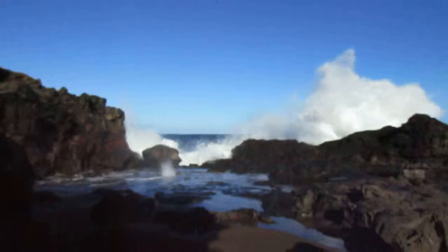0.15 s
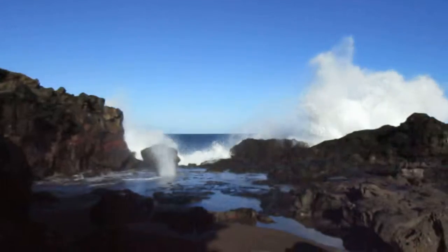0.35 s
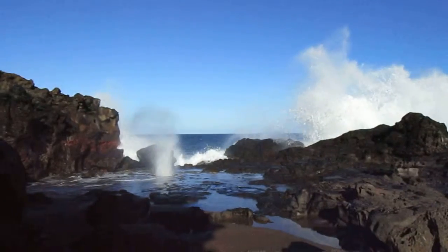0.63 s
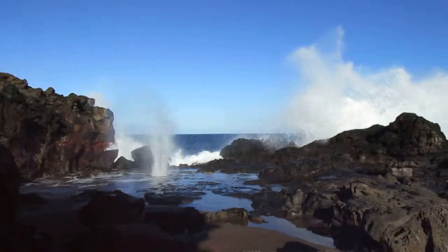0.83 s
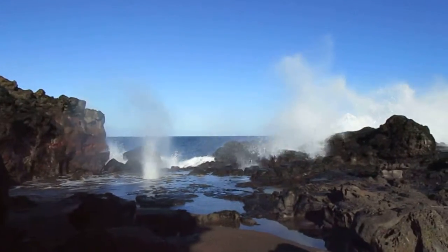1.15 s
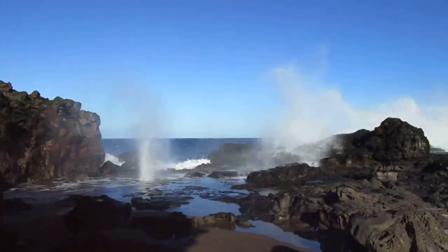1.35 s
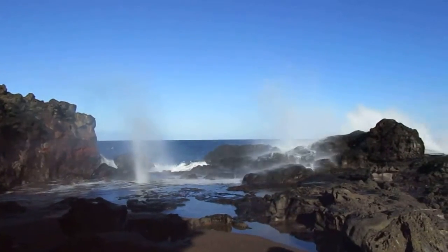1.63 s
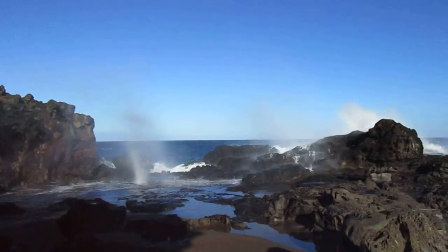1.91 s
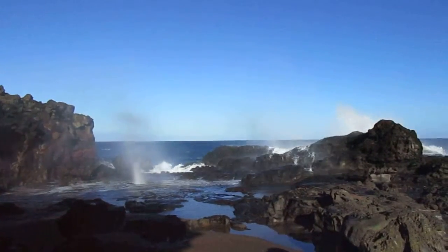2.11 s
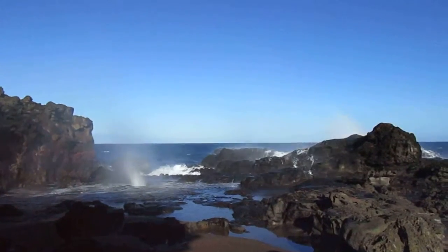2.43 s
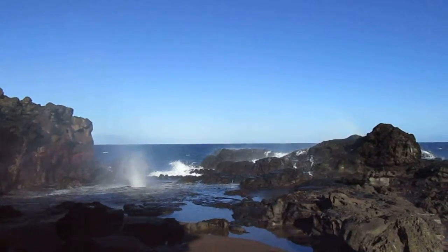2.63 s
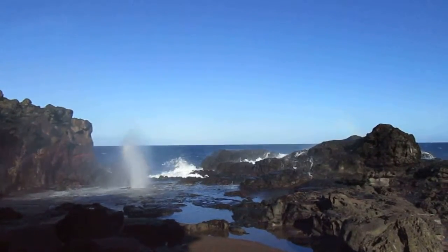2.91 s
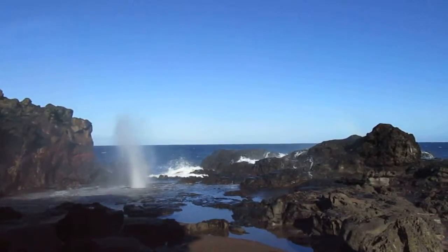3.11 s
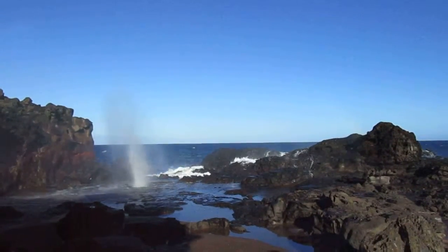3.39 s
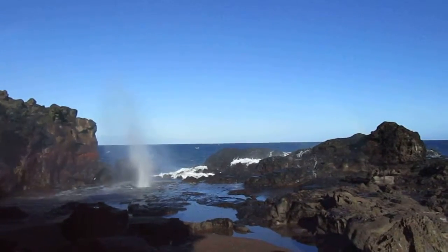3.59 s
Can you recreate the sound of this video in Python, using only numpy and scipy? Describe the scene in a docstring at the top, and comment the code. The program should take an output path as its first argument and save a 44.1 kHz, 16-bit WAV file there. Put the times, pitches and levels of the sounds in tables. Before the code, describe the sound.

Surf bursts over shore rocks and the falling spray hisses, then drops away to quiet water and a faint blowhole jet. Stiff gusts thump on the microphone all along, later adding short rasps, snaps and hollow knocks.

```python
"""A rocky shore in a stiff wind. The sound cuts in on a breaker bursting on the rocks, its spray raining
down as a broad hiss, while eddies buffet the microphone with low thumps that go on throughout. From about
one second the fastest eddies tear at its port with rasps and snaps. Near two seconds the hiss dies away
to the wash of the sea and the faint jet of a blowhole, and the port gives a few hollow knocks."""
import sys
import numpy as np
from scipy import signal
from scipy.fft import rfft, irfft
from scipy.io import wavfile
from scipy.ndimage import uniform_filter1d, minimum_filter1d

SR = 44100
rng = np.random.default_rng(int(sys.argv[2]) if len(sys.argv) > 2 else 0)


def output_pcm(signal):
    """Save a mono or channel-first signal as 16-bit PCM at the path in sys.argv[1].

    Samples are clipped to [-1, 1] before scaling.
    """
    pcm = np.clip(np.atleast_2d(signal).T, -1, 1) * 32767
    wavfile.write(sys.argv[1], SR, np.round(pcm).astype(np.int16))


N = 165375
T = np.arange(N) / SR
FREQS = np.fft.rfftfreq(N, 1 / SR)


def undb(db):
    """Decibels to gain."""
    return 10 ** (np.asarray(db) / 20)


def unit(x):
    """Scale to rms 1."""
    return x / np.sqrt(np.mean(x ** 2))


def fader(table, column=1):
    """Gain over time from one dB column of a table."""
    rows = np.array(table)
    return undb(np.interp(T, rows[:, 0], rows[:, column]))


def colour(x, eq):
    """Shape a signal with an EQ curve, at rms 1."""
    hz, db = np.array(eq).T
    gain = undb(np.interp(np.log(FREQS + 1), np.log(hz), db))
    return unit(irfft(rfft(x) * gain, N))


def noise():
    """White noise."""
    return rng.standard_normal(N)


def wander(rate_hz):
    """Smooth random modulation at rms 1, rolling off above rate_hz."""
    return unit(irfft(rfft(noise()) * np.exp(-(FREQS / rate_hz) ** 2), N))


def turbulence(eq, rough_db, rate_hz):
    """Pressure that comes in clumps, as small eddies ride on large ones."""
    clumps = noise() * undb(rough_db * np.clip(wander(rate_hz), -2, 2))
    return colour(clumps, eq)


def ride_level(x, span_s):
    """Hold the slow level of a signal at 1 and keep its quick flutter."""
    size = int(span_s * SR)
    power = uniform_filter1d(uniform_filter1d(x ** 2, size), size)
    return x / np.sqrt(power + 1e-9)


def burst(x, start, length, db, edge_s):
    """Gate out a soft-edged stretch of a signal and set its rms level."""
    gated = x * (1 + np.tanh((T - start) / edge_s)) * (1 + np.tanh((start + length - T) / edge_s))
    return gated * undb(db) * np.sqrt(length * SR / np.sum(gated ** 2))


# The bright tone of spray. Each row: frequency in Hz, relative level in dB.
SPRAY_EQ = [(500, -15), (2000, 2.5), (3800, -1), (6000, 2), (8500, 2), (10000, -0.5), (12000, -5),
            (14000, -11.5), (15700, -19)]
# Fader for the falling spray and the blowhole jet. Each row: time in seconds, level in dB.
SPRAY_FADER = [(.19, -38), (.65, -41), (.9, -34), (.935, -39), (.985, -36.5), (1.04, -41.5), (1.41, -31),
               (1.68, -30.5), (1.86, -34.5), (2.078, -41), (2.09, -48.5), (2.23, -52), (2.33, -51),
               (2.355, -58.5), (2.7, -54.5), (3.05, -56.5), (3.25, -59), (3.74, -61)]
DROPS_PER_S, DROP_MIX = 890, 0.26


def spray():
    """Fine mist hisses and countless drops patter on rock; the faint tail is the blowhole jet."""
    drops = (rng.random(N) < DROPS_PER_S / SR) * noise()
    hiss = colour(noise() + DROP_MIX * unit(drops), SPRAY_EQ)
    return hiss * fader(SPRAY_FADER) * undb(0.74 * wander(rate_hz=22))


# The midrange body of white water. Each row: frequency in Hz, relative level in dB.
WASH_EQ = [(100, -41), (400, 8.5), (1000, 2), (1600, 5), (2400, 2), (3200, -1), (4200, -4), (6000, -59),
           (14000, -42)]
# Fader for the churning water. Each row: time in seconds, level in dB before the trim.
WASH_FADER = [(.19, -35), (.72, -36.5), (.85, -33.5), (.895, -30.5), (.94, -36), (1.04, -37.5), (1.19, -35),
              (1.68, -33), (1.86, -36), (2.04, -41.5), (2.11, -49.5), (2.31, -55.5), (2.36, -57.5),
              (2.7, -51.5), (2.95, -54), (3.74, -55.5)]
WASH_TRIM_DB, CROSSOVER_HZ = -1, 1600


def wash():
    """White water churns among the rocks; its lows and highs seethe separately."""
    water = colour(noise(), WASH_EQ)
    lows = irfft(rfft(water) / (1 + (FREQS / CROSSOVER_HZ) ** 4), N)
    highs = water - lows
    seething = lows * undb(.9 * wander(rate_hz=20)) + highs * undb(.7 * wander(rate_hz=25))
    return seething * fader(WASH_FADER) * undb(WASH_TRIM_DB)


# The wind's deep rumble and the rounder thump above it. Each row: frequency in Hz, relative level in dB.
RUMBLE_EQ = [(12, 2), (25, -5.5), (60, 1), (110, -2.5), (160, -7.5), (300, -65.5), (1200, -110)]
THUMP_EQ = [(60, -12), (110, 0), (150, 1), (215, -1), (330, -6), (450, -14.5), (560, -20), (700, -30.5),
            (1000, -47), (4000, -110)]
# The wind bed between buffets. Each row: time in seconds, rumble and thump in dB before the trim.
BREEZE_FADERS = [(.19, -28, -21), (.5, -7.5, -26), (.75, -24.5, -22), (1.0, -19, -21.5), (1.35, -22, -21.5),
                 (2.1, -16.5, -26), (2.28, -17, -17.5), (2.37, -33, -42), (2.46, -19, -17.5),
                 (2.56, -25.5, -25), (2.75, -38, -15.5), (2.88, -38, -26), (3.0, -17, -20.5),
                 (3.09, -30.5, -37.5), (3.3, -22.5, -25), (3.55, -23, -33.5), (3.74, -34.5, -42.5)]
BREEZE_TRIM_DB = -4


def breeze():
    """Restless low flutter of wind on the microphone."""
    rumble = ride_level(turbulence(RUMBLE_EQ, rough_db=7.5, rate_hz=29.6), span_s=0.11)
    thump = ride_level(turbulence(THUMP_EQ, rough_db=4, rate_hz=24), span_s=0.31)
    bed = rumble * fader(BREEZE_FADERS, column=1) + thump * fader(BREEZE_FADERS, column=2)
    return bed * undb(BREEZE_TRIM_DB)


# The higher thump of a fast eddy. Each row: frequency in Hz, relative level in dB.
FAST_THUMP_EQ = [(70, -11.5), (150, 5), (300, 2.5), (520, -3.5), (720, -17), (1000, -22.5), (4000, -110)]
# Eddies hitting the microphone. Each row: start and length in seconds, rumble and thump in dB before trims.
BUFFET_CUES = [(0.176, 0.031, -9.5, -16.5), (0.263, 0.012, -6.5, -11.5), (0.36, 0.063, -5, -17),
               (0.473, 0.063, -8.5, -24), (0.501, 0.057, -2, -27), (0.601, 0.044, -5, -13.5),
               (0.889, 0.037, -5.5, -7.5), (0.959, 0.031, 2, -24), (0.99, 0.022, -2, -2),
               (1.03, 0.0086, -21, -2), (1.067, 0.0097, -32, -7), (1.141, 0.048, -31, -12.5),
               (1.451, 0.068, -11.5, -12), (1.537, 0.068, -10.5, -15), (1.699, 0.028, -7.5, -24),
               (1.808, 0.044, -8, -12), (1.864, 0.041, 0, -11), (1.972, 0.071, -5, -12),
               (2.056, 0.012, 4, -4), (2.111, 0.02, -21, -3.5), (2.146, 0.016, 0.5, -8.5),
               (2.192, 0.018, -1.5, -3.5), (2.252, 0.044, -12, -9.5), (2.314, 0.038, -13, -11),
               (2.391, 0.042, -31, -8.5), (2.609, 0.0085, -20, -20.5), (2.673, 0.012, 0, -4),
               (2.716, 0.046, -15, -8.5), (2.776, 0.015, -9, -6), (2.831, 0.026, -13.5, -10.5),
               (2.988, 0.0085, -8, -4), (3.189, 0.0099, -10.5, -18), (3.259, 0.018, -10.5, -16.5),
               (3.394, 0.05, -24, -13.5), (3.483, 0.0085, -2.5, -14), (3.559, 0.039, -13, -26)]
RUMBLE_TRIM_DB, THUMP_TRIM_DB, BUFFET_EDGE_S = -10, -7, 0.0048
FAST_SPAN_DB = 4  # excess of thump over rumble that turns an eddy fast


def buffets():
    """Each large eddy pushes on the microphone with a rumble and a thump; faster ones thump higher."""
    rumble = turbulence(RUMBLE_EQ, rough_db=-1, rate_hz=160)
    slow = turbulence(THUMP_EQ, rough_db=5.5, rate_hz=204)
    fast = turbulence(FAST_THUMP_EQ, rough_db=5.5, rate_hz=204)
    out = np.zeros(N)
    for start, length, rumble_db, thump_db in BUFFET_CUES:
        fast_mix = (1 + np.tanh((thump_db - rumble_db) / FAST_SPAN_DB)) / 2
        thump = np.sqrt(1 - fast_mix) * slow + np.sqrt(fast_mix) * fast
        out += burst(rumble, start, length, rumble_db + RUMBLE_TRIM_DB, BUFFET_EDGE_S)
        out += burst(thump, start, length, thump_db + THUMP_TRIM_DB, BUFFET_EDGE_S)
    return out


# Sharp pressure hits from small eddies, plus one thin overload click as the slap at 2.33 s clips the
# recorder. Each row: time in seconds, peak in dB, half-width in seconds.
SLAP_AND_CLICK_CUES = [(0.27, -3, 0.0012), (0.609, -9, 0.00064), (0.918, 3, 0.0013), (1.504, -4, 0.00087),
                       (2.1935, -4.5, 0.0013), (2.3328, 1.5, 0.0013), (2.3325, -26, 0.00006),
                       (2.472, -10, 0.00072), (2.99, -7, 0.0011), (3.276, -10.5, 0.00071),
                       (3.488, -5, 0.001)]


def slaps_and_click():
    """Small eddies each push once, with slight suction either side; the thinnest pulse is the click."""
    out = np.zeros(N)
    for time, db, half_width in SLAP_AND_CLICK_CUES:
        offset = (T - time) / half_width
        out += undb(db) * (1 - offset ** 2) * np.exp(-offset ** 2 / 2)
    return out


# The throaty tone of a rasp. Each row: frequency in Hz, relative level in dB.
RASP_EQ = [(150, -18), (300, 8), (520, 18), (750, 10.5), (1000, 1), (1350, 2), (1700, -7.5), (2350, -14.5),
           (3000, -59), (6000, -62)]
# Fast air tearing at the port. Each row: start and length in seconds, level in dB before the trim.
RASP_CUES = [(1.063, 0.0083, -32.5), (1.106, 0.012, -33), (2.121, 0.0087, -25), (2.191, 0.024, -35.5),
             (2.244, 0.043, -28), (2.321, 0.018, -24.5), (2.396, 0.016, -31), (2.775, 0.0086, -23),
             (3.394, 0.011, -36.5)]
RASP_TRIM_DB, TEAR_EDGE_S = 6.5, 0.00065


def rasps():
    """The flow breaks away at the port in a rapid string of tiny spits."""
    spits = turbulence(RASP_EQ, rough_db=3.0, rate_hz=230)
    return sum(burst(spits, start, length, db + RASP_TRIM_DB, TEAR_EDGE_S)
               for start, length, db in RASP_CUES)


# The tone of a snap. Each row: frequency in Hz, relative level in dB.
SNAP_EQ = [(150, -1), (550, 6), (1350, 1), (2500, -19.5), (3400, -29), (7000, -63)]
# Single bright snaps at the port. Each row: time in seconds, level in dB.
SNAP_CUES = [(1.063, -23.5), (2.0834, -10.5), (2.2345, -20.5), (2.256, -17.5), (2.2635, -32), (2.3273, -14),
             (2.404, -36), (2.4263, -29), (2.433, -24.5), (2.743, -18.5), (2.756, -26), (2.778, -25),
             (2.8531, -26), (2.859, -21.5), (2.9905, -22), (3.4314, -33)]
SNAP_S = 0.0027


def snaps():
    """Now and then the flow lets go all at once: one jolt of pressure, heard as a short crisp snap."""
    jolts = np.zeros(N)
    jolts[[int(time * SR) for time, db in SNAP_CUES]] = 1
    air = colour(jolts, SNAP_EQ)
    return sum(burst(air, time - SNAP_S / 2, SNAP_S, db, TEAR_EDGE_S) for time, db in SNAP_CUES)


# Strong eddies ringing the port. Each row: centre time and half-length in seconds, peak in dB.
KNOCK_CUES = [(2.0805, 0.0033, -0.5), (2.394, 0.0041, -14.5), (2.741, 0.015, -17), (2.846, 0.0046, -15.5)]
PORT_HZ = 442


def knocks():
    """The air in the port swings for a few cycles and gives the hardest gusts a hollow knock."""
    out = np.zeros(N)
    for time, half_length, db in KNOCK_CUES:
        envelope = undb(db) * np.exp(-((T - time) / half_length) ** 2)
        out += envelope * np.sin(2 * np.pi * (PORT_HZ * (T - time) + rng.random()))
    return out


def scene():
    """Sea and wind at one microphone."""
    mix = spray() + wash() + breeze() + buffets() + slaps_and_click() + rasps() + snaps() + knocks()
    return mix[None, :]


def limiter(x, ceiling, smooth_s):
    """Turn the gain down smoothly around peaks that pass the ceiling."""
    size = int(smooth_s * SR)
    gain = minimum_filter1d(ceiling / np.maximum(np.abs(x), ceiling), 2 * size)
    return x * uniform_filter1d(uniform_filter1d(gain, size), size)


# Notches in the response of the microphone port. Each row: centre in Hz, half-width in Hz, depth in dB.
PORT_NOTCHES = [(790, 115, 5.5), (3220, 260, 4.5), (4820, 380, 9), (4820, 140, 7)]
CUT_IN_S, FADE_IN_S, HIGH_CUT_HZ = .191, 0.0027, 15730


def record(dry):
    """The port colours the sound; the recorder cuts in, limits the largest thumps and drops the top."""
    notches_db = sum(depth * np.exp(-((FREQS - hz) / width) ** 2) for hz, width, depth in PORT_NOTCHES)
    fade_in = np.clip((T - CUT_IN_S) / FADE_IN_S, 0, 1)
    heard = irfft(rfft(dry * fade_in) * undb(-notches_db), N)
    high_cut = signal.ellip(10, .2, 80, HIGH_CUT_HZ, fs=SR, output="sos")
    return signal.sosfilt(high_cut, limiter(heard, ceiling=.98, smooth_s=.0015))


dry = scene()
out = record(dry)
output_pcm(out)
```